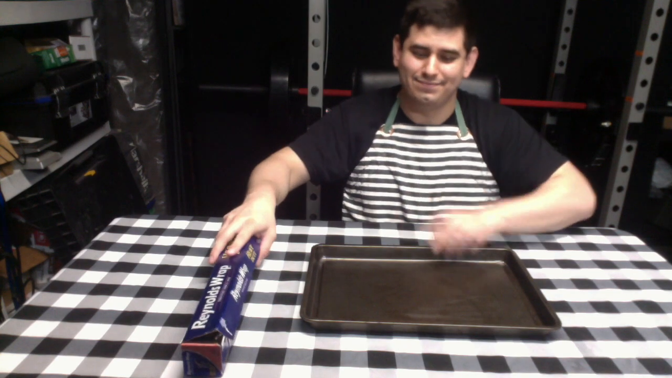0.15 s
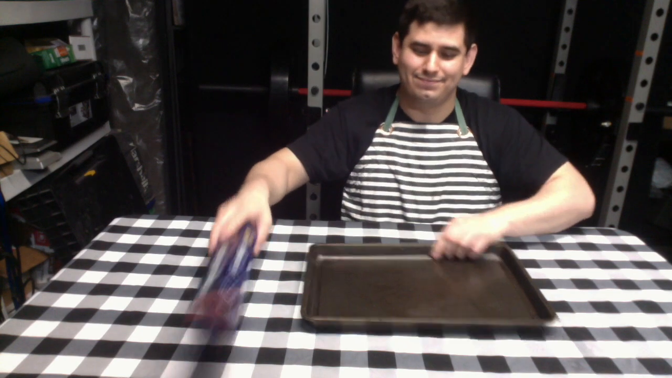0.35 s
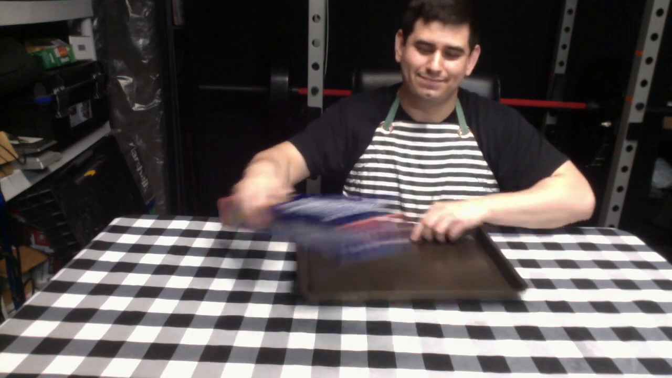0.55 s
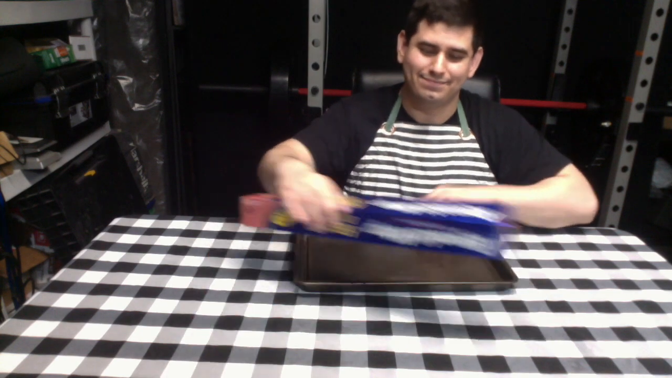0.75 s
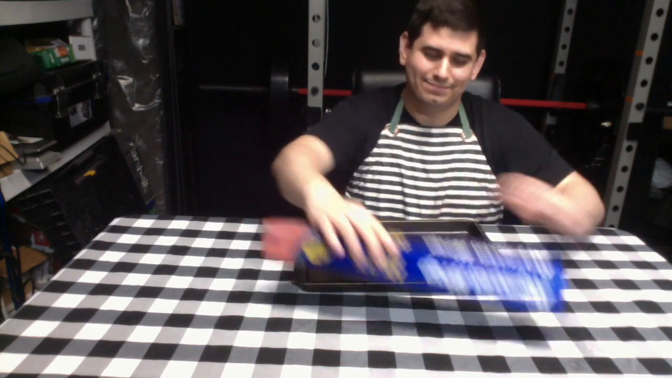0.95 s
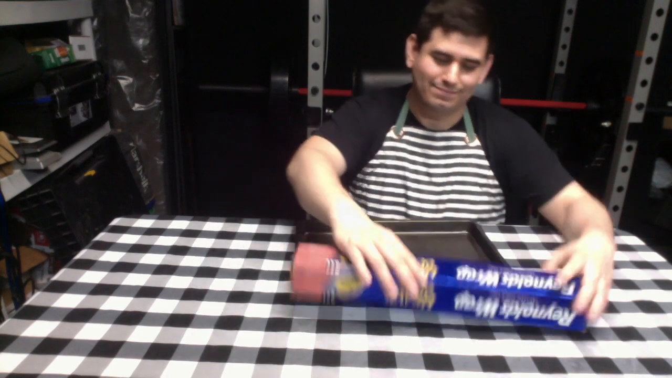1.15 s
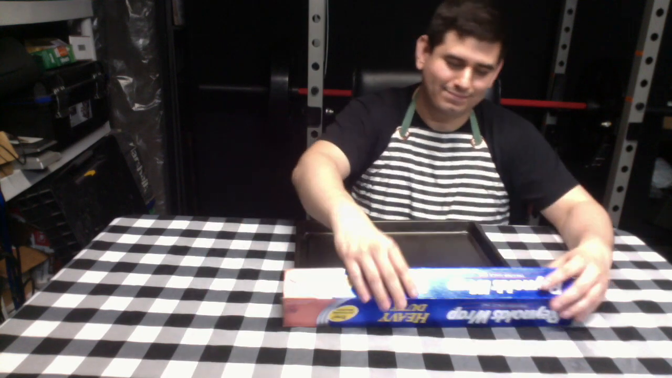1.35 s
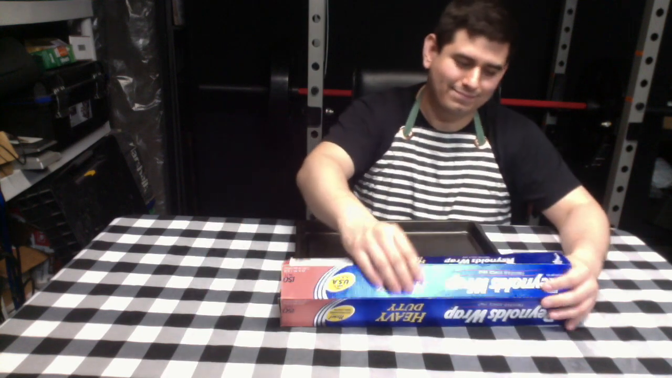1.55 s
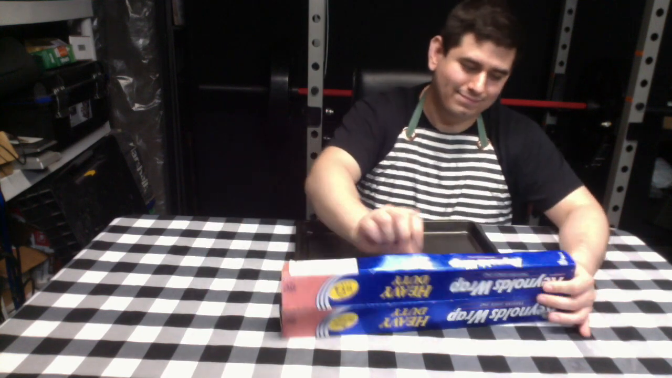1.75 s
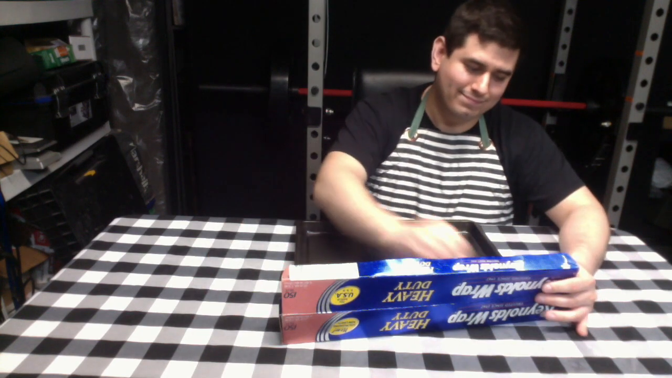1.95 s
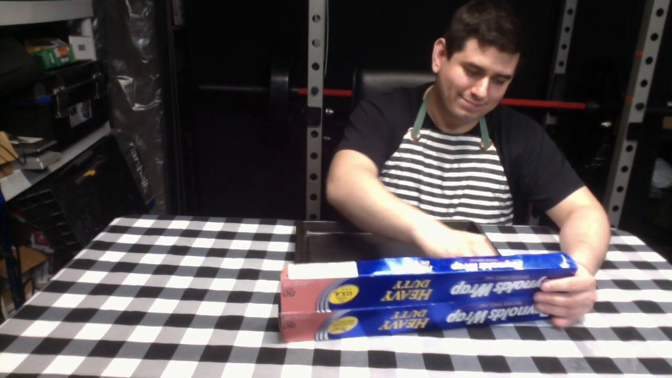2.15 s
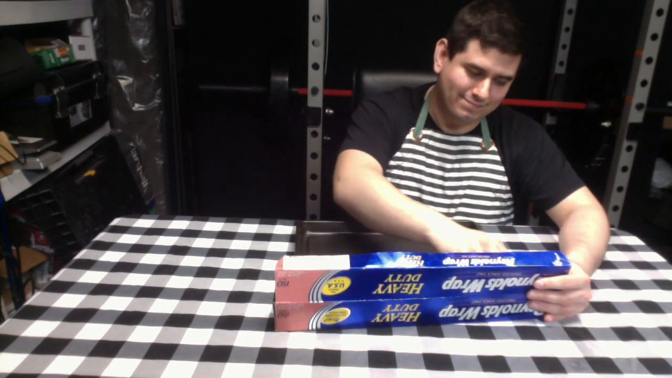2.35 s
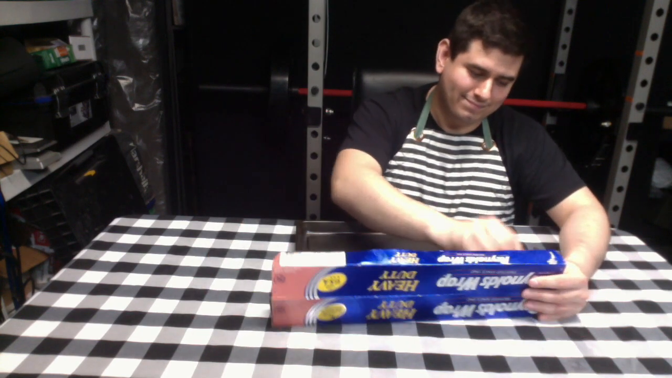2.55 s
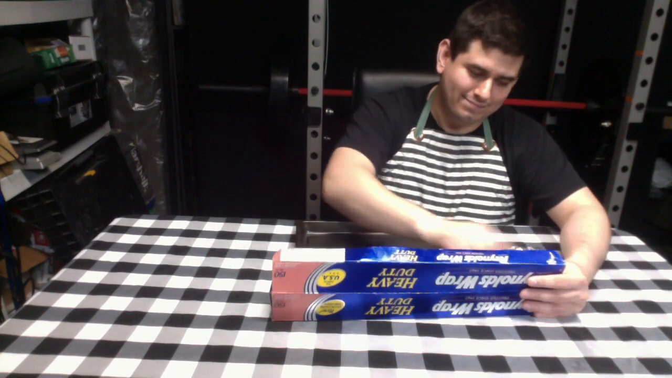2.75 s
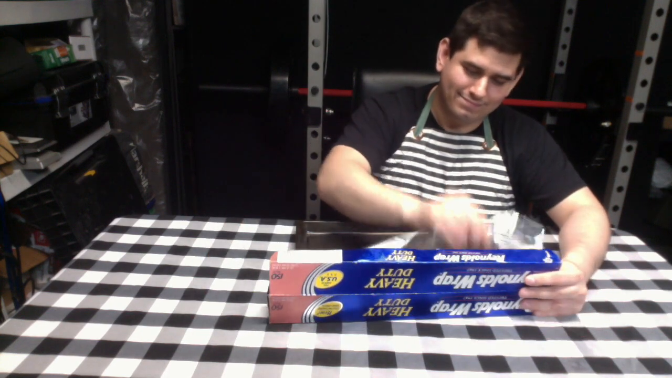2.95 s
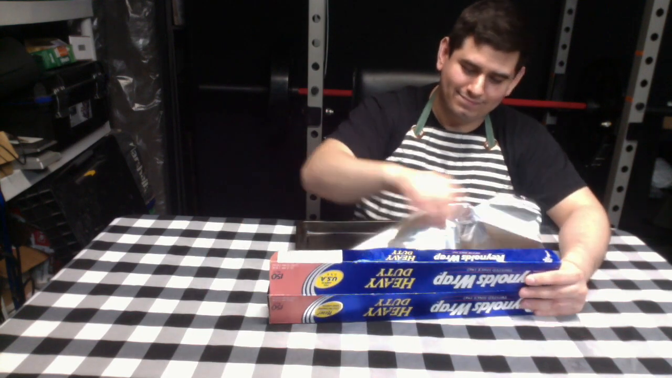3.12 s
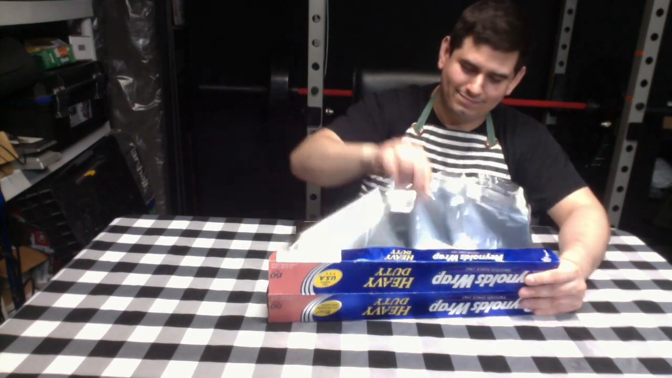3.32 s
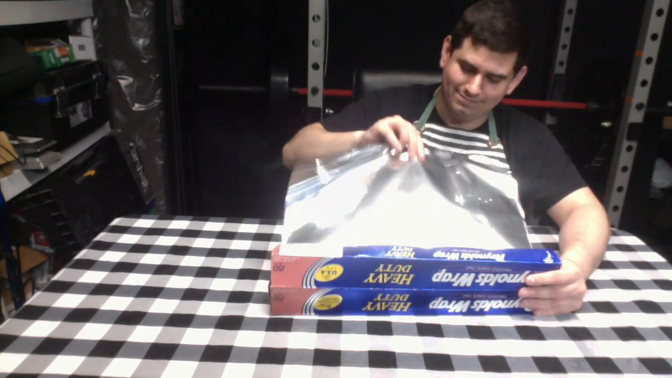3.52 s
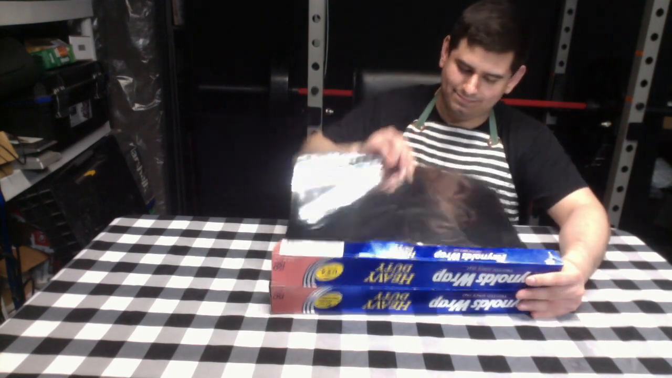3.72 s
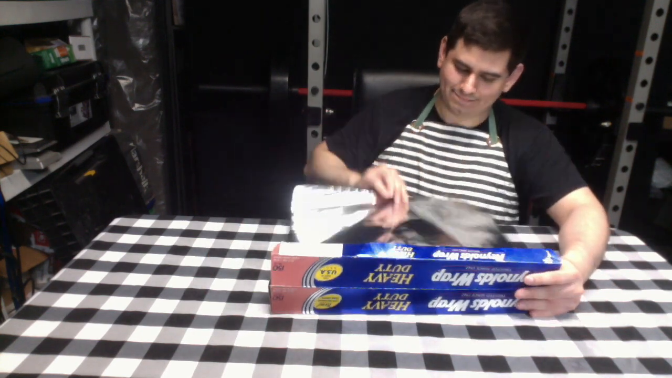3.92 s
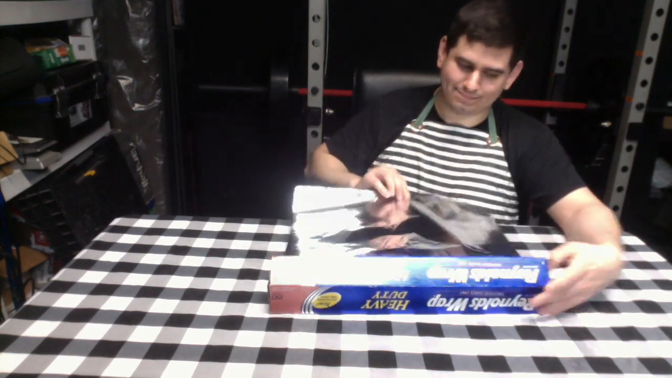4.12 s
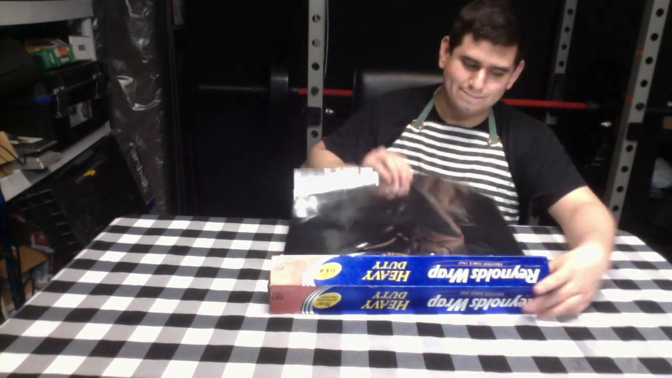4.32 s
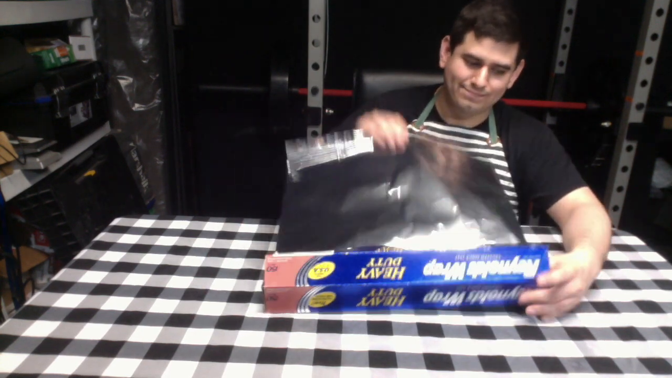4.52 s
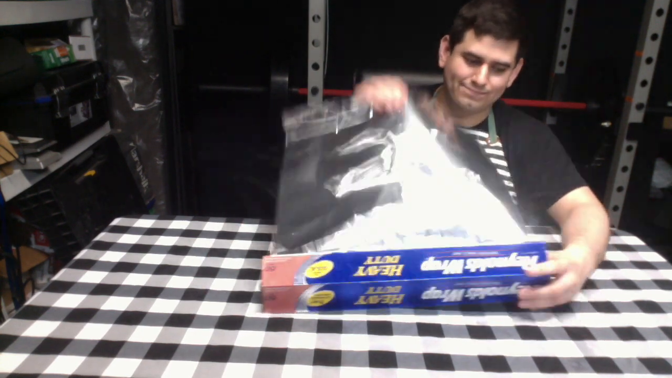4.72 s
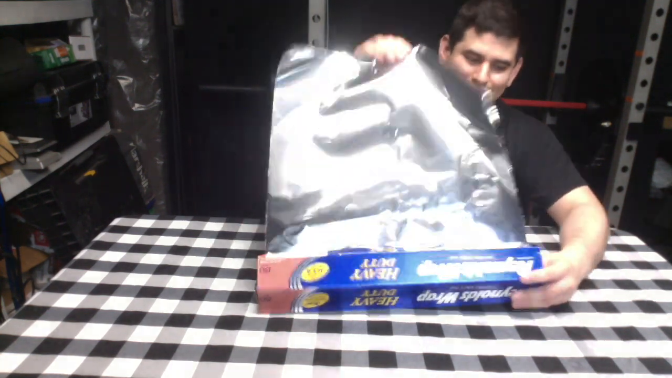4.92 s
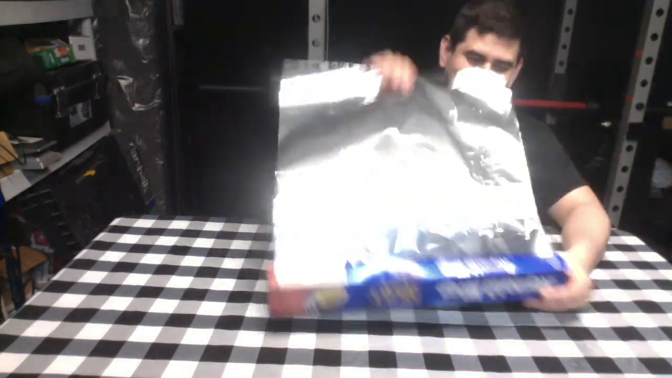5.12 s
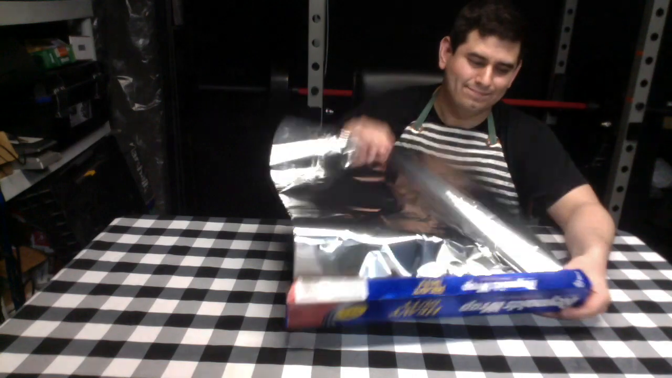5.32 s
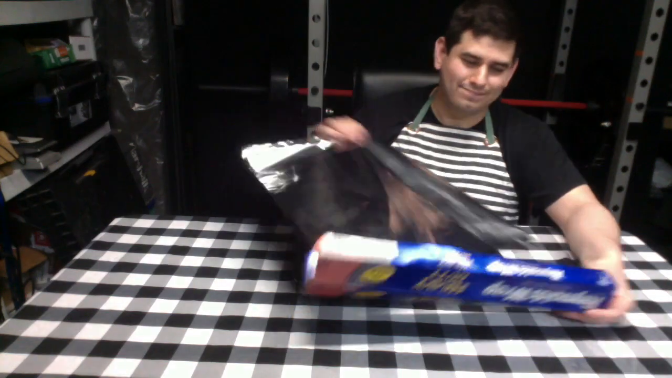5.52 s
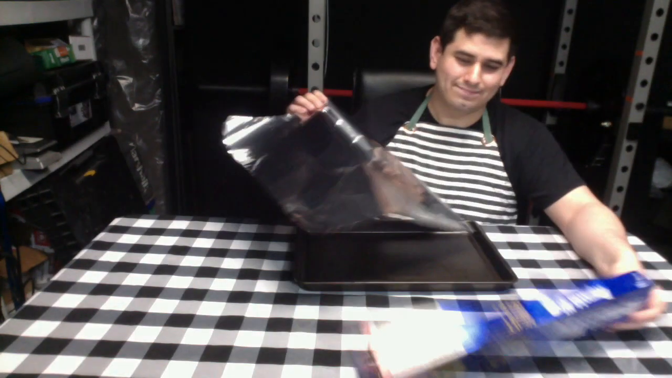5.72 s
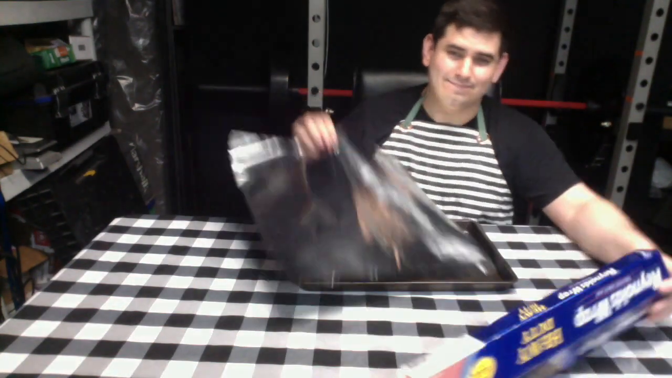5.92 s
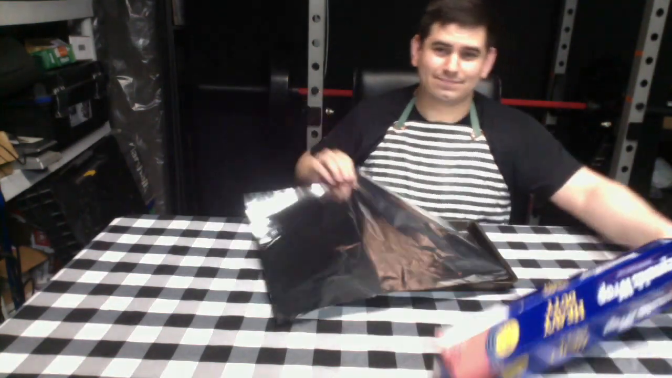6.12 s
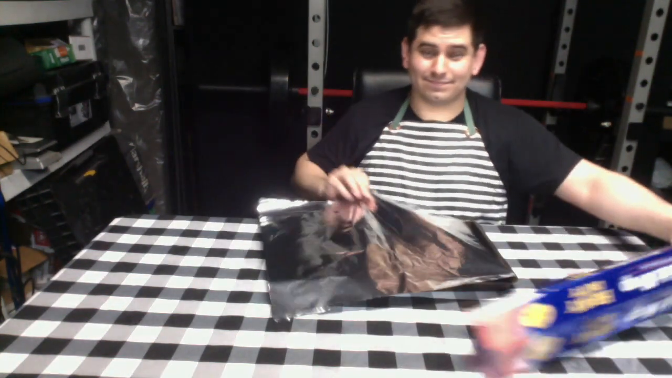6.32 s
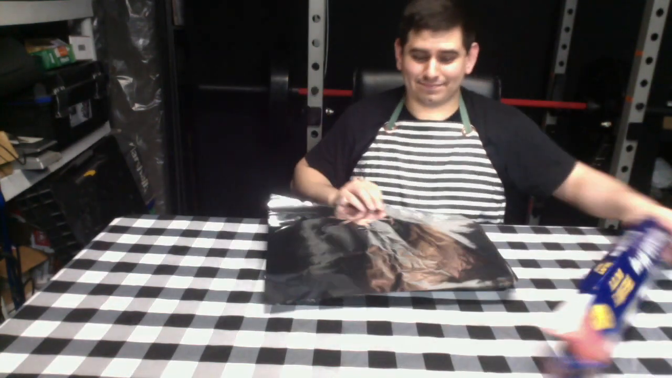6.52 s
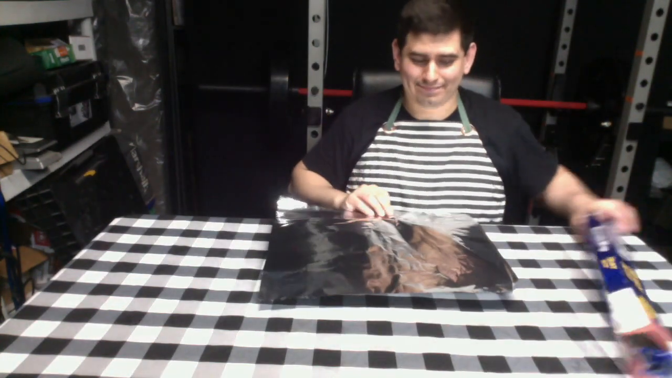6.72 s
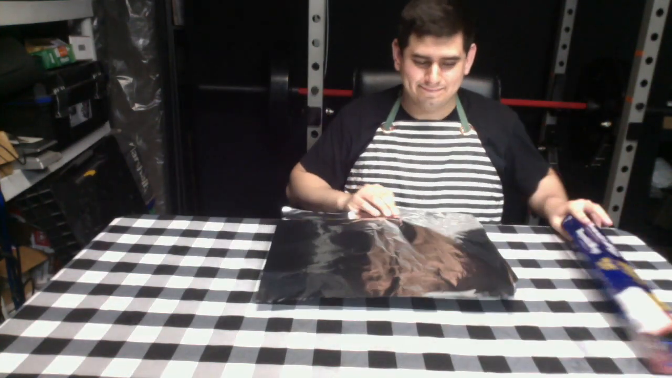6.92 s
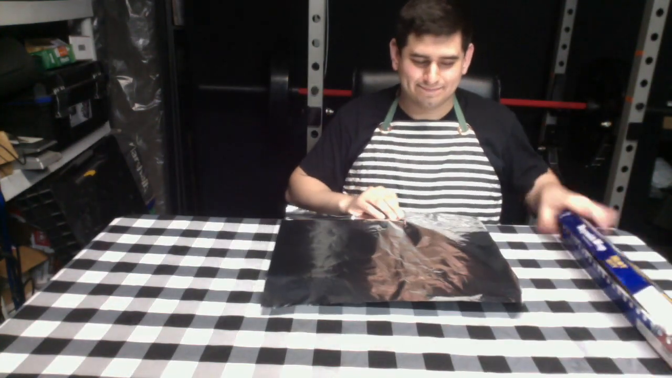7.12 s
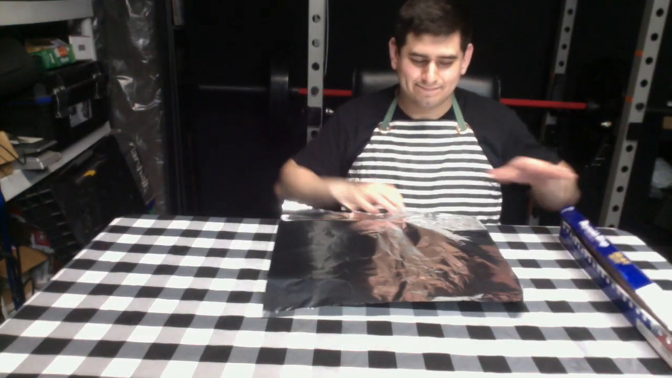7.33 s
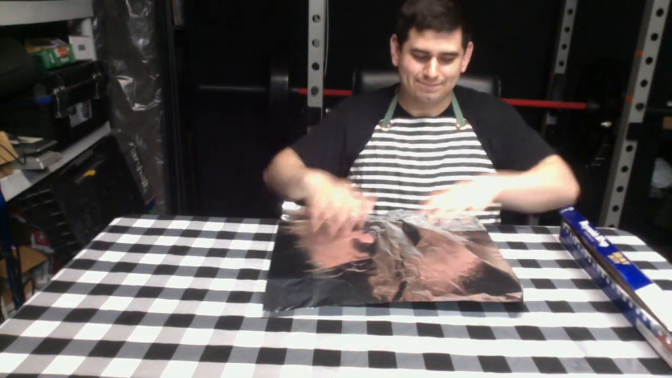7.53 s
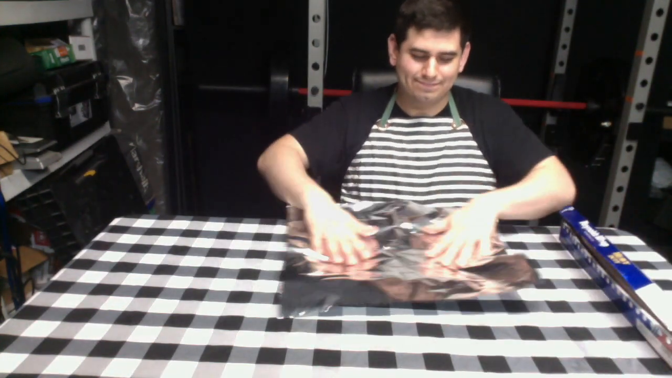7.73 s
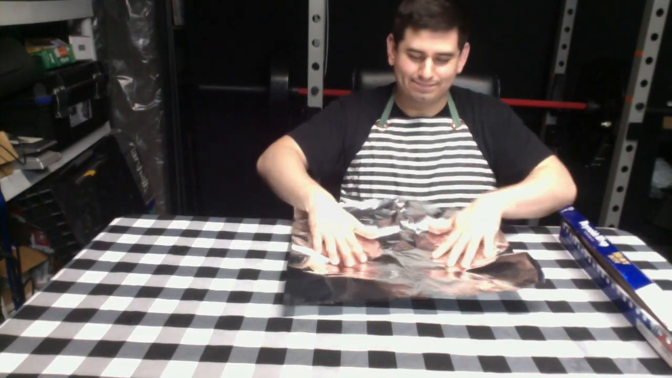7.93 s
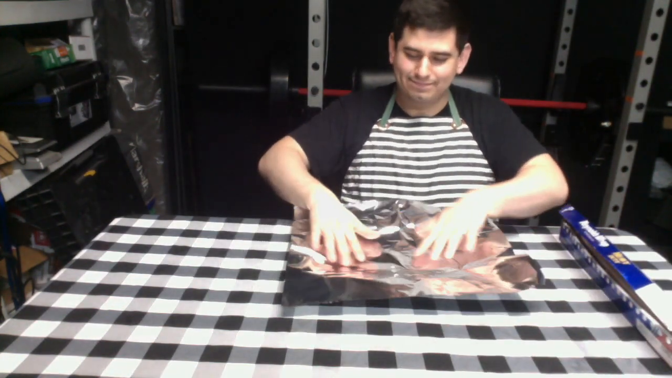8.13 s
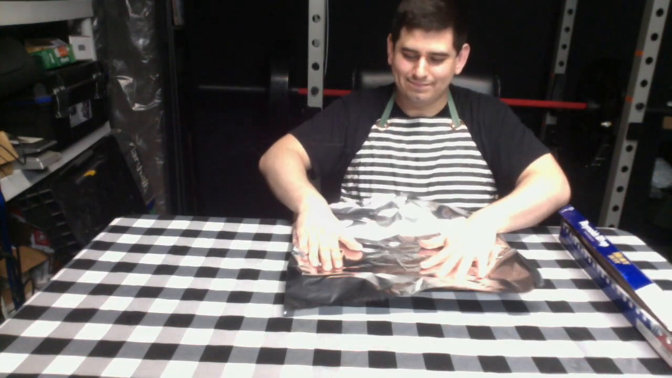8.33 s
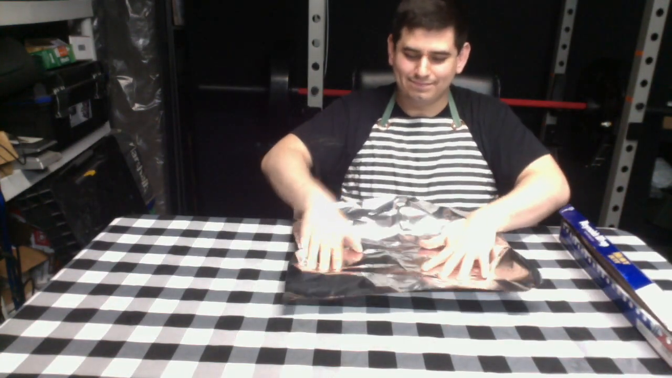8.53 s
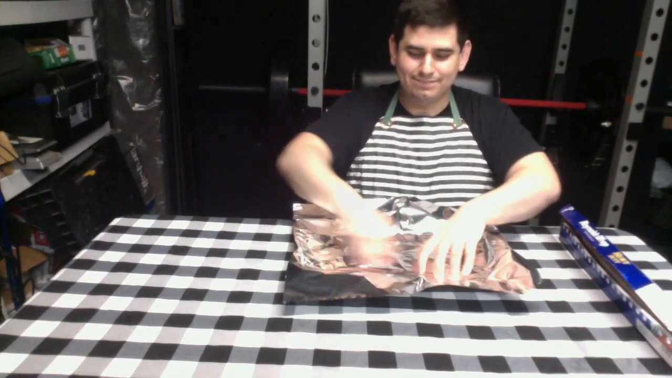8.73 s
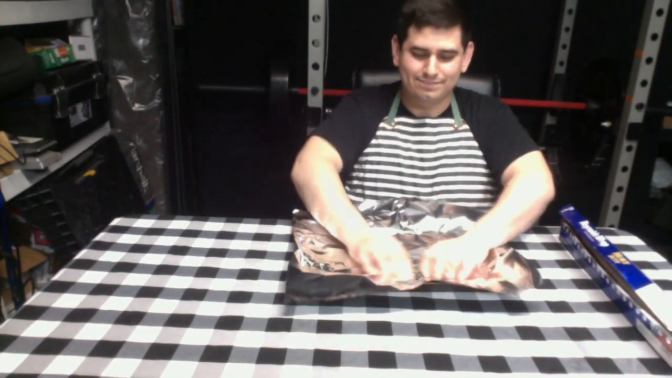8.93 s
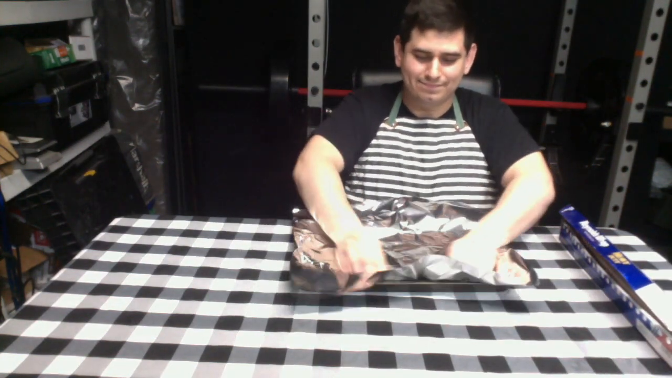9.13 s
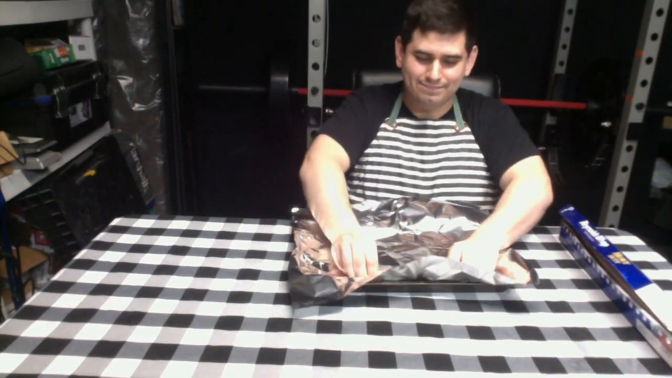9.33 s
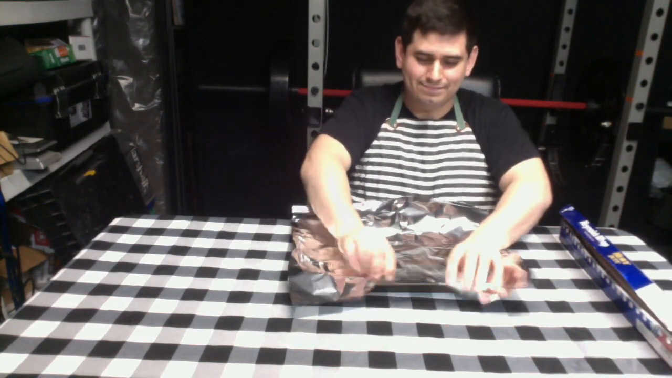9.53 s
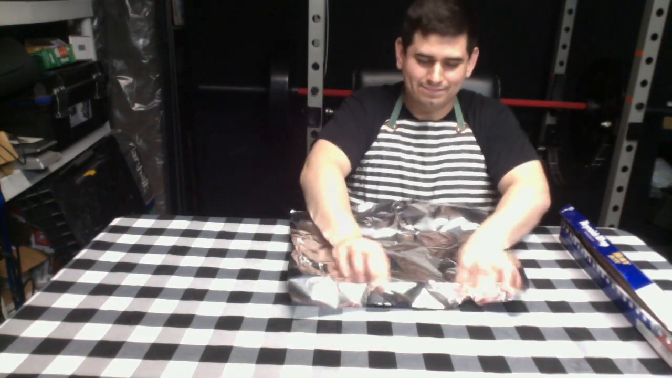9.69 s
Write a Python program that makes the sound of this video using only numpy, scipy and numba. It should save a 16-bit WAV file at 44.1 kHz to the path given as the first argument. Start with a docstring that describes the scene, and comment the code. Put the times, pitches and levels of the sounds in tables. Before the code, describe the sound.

In a small room, close to one microphone, a baking sheet and carton scuff across a cloth-covered table. The carton lands with a dull thump and its lid squeaks faintly. Foil rustles out in swelling crackles, goes briefly slack, is pulled taut and rips along the cutter with a raspy metallic ring. After a knock and lighter rustling, hands press it down in crisp bursts with sharp pops.

```python
"""Aluminium foil is drawn off the roll, torn along the cutter, laid on a baking sheet and pressed down.
Thousands of tiny buckles a second, each a short damped ring, make the crinkle; the torn edge rings in catches.
Before that the sheet slides over a tablecloth in crackling shoves, and the carton is set down and opened.
Knocks are table resonances with noise clatter, snaps are noise cracks with a tone, the lid is a wavering sine.
A small room of decaying noise smears it all for one microphone, over faint noise for the air."""
import sys
import numpy as np
from scipy import signal
from scipy.fft import rfft, irfft
from scipy.io import wavfile
from scipy.ndimage import uniform_filter1d, minimum_filter1d
from numba import njit

SR = 44100
rng = np.random.default_rng(int(sys.argv[2]) if len(sys.argv) > 2 else 0)


def wrap_up_sound(samples):
    """Save the sound to the file named by the first command line argument, as 16-bit audio."""
    columns = np.atleast_2d(samples).T
    # keep every value between -1 and 1, then stretch to whole-number steps
    tamed = np.clip(columns, -1, 1)
    steps = np.round(tamed * 32767).astype(np.int16)
    wavfile.write(sys.argv[1], SR, steps)


N = 430416
TIME = np.arange(N) / SR
# frequency ranges in which creases, fine wrinkles and broad panels are balanced (Hz)
CREASE_HZ, WRINKLE_HZ, PANEL_HZ = (1500, 5000), (8000, 15000), (400, 1200)

# overlapping bands of the foil and how far each follows a kind of facet:
# centre_hz, fine_wrinkles (factor), broad_panels (factor), drumming_on_sheet (factor)
BANDS = [(150, .3, 1, 0), (800, 0, 1, 0), (1550, 0, .25, 1), (2300, -.05, 0, .5), (4500, .25, 0, -.5),
         (7000, .6, 0, -.25), (11000, 1, 0, 0), (15000, 1.3, 0, 0)]
# crumples, where a hand grabs, tugs or presses the foil:
# start_s, rise_s, hold_s, level_db, fine_wrinkles_relative_db, broad_panels_relative_db
CRUMPLES = [(2.232, 0.019, 0.0051, -64, -6, -12), (2.347, .036, 0.0029, -53, -7.5, -1),
            (2.464, 0.033, 0.061, -52, -9.5, -4.5), (2.6, 0.016, 0.018, -59, -4.5, -8),
            (2.776, .015, 0.032, -47, -11.5, -14), (2.856, 0.05, 0.015, -46, -6.5, -5.5),
            (2.938, 0.021, .022, -43, -8.5, -7.5), (3.213, 0.02, .02, -45, -2.5, -7.5),
            (3.329, 0.025, 0.04, -41, -4, -25), (3.729, 0.042, .02, -41, -2, -12),
            (3.936, .03, 0.063, -45, -3.5, -15), (4.396, .016, .015, -43.5, -3.5, -9.5),
            (4.462, 0.035, 0.019, -43, -1.5, -16), (4.623, 0.028, 0.023, -37.5, -4.5, -24),
            (4.841, 0.062, 0.0077, -36, -3.5, -14), (5.064, .022, .02, -38.5, -0.5, -12),
            (5.112, 0.019, 0.072, -34, -2.5, -11.5), (5.238, .02, 0.26, -33, 0.5, -11),
            (5.865, .05, 0.014, -46, -1.5, -25), (6.018, 0.021, 0.019, -45, 0, -14.5),
            (6.056, 0.034, 0.026, -38, -2, -19), (6.273, 0.031, 0.048, -50, -5.5, -16),
            (6.354, 0.032, 0.04, -44.5, -4, -15.5), (6.548, 0.023, .012, -51, -2, -11.5),
            (6.653, 0.013, 0.015, -51, 0.5, -11.5), (6.945, 0.026, .02, -54, -4, -10.5),
            (7.159, .02, .02, -53, -7, -18), (7.223, 0.023, .015, -53, -15, -16),
            (7.518, .02, 0.044, -34.5, -2.5, -14), (7.624, .02, .022, -41, -1, -18),
            (7.747, .012, 0.11, -44, -4.5, -15), (8.126, 0.031, 0.03, -34.5, -0.7, -12.5),
            (8.393, 0.025, .02, -45, -8.5, -23), (8.549, 0.039, 0.075, -48.5, -7, -11.5),
            (8.761, .016, 0.044, -36.5, -6, -12), (8.895, .02, 0.048, -40.5, -9, -16),
            (8.998, 0.021, 0.051, -46, -8, -9.5), (9.146, 0.02, 0.013, -51, -7, -8),
            (9.254, 0.034, 0.047, -47, -10.5, -8), (9.39, 0.014, 0.066, -44, -8, -9),
            (9.5, 0.033, 0.25, -44.5, -11, -43)]


def amp(db):
    """Decibels to gain."""
    return 10 ** (np.asarray(db) / 20)


def rms(x):
    """Root mean square."""
    return np.sqrt(np.mean(x ** 2)) + 1e-12


def curves(table):
    """Each column of a table joined by straight lines in time."""
    s, *columns = np.transpose(table)
    return [np.interp(TIME, s, column) for column in columns]


def during(table):
    """One while a table lasts, with short fades."""
    inside = (TIME >= table[0][0]) & (TIME <= table[-1][0])
    return uniform_filter1d(1. * inside, size=300)


def colour(x, points):
    """Filter by a spectrum of (Hz, dB) points, joined on a logarithmic frequency axis."""
    hz, db = np.transpose(points)
    f = np.maximum(np.fft.rfftfreq(len(x), 1 / SR), 1)
    gain = amp(np.interp(np.log(f), np.log(hz), db))
    return irfft(rfft(x) * gain, len(x))


def band(x, edges, kind="bandpass"):
    """Zero-phase filter, so that bands add up again."""
    return signal.sosfiltfilt(signal.butter(2, edges, kind, fs=SR, output="sos"), x)


def band_rms(x, edges):
    """Level of the part of x between two frequencies."""
    f = np.fft.rfftfreq(N, 1 / SR)
    inside = (f > edges[0]) & (f < edges[1])
    return np.sqrt(2 * np.sum(abs(rfft(x)[inside]) ** 2)) / N


def octave(x, order):
    """One of the overlapping bands that add up to x."""
    f = np.maximum(np.fft.rfftfreq(N, 1 / SR), 1)
    centres = np.transpose(BANDS)[0]
    weight = np.interp(np.log(f), np.log(centres), np.eye(len(BANDS))[order])
    return irfft(rfft(x) * weight, N)


def walk(rate):
    """Random wandering with a spread near one, drawn anew rate times a second."""
    return 1.2 * np.interp(TIME * rate, np.arange(N), rng.standard_normal(N))


def fade(t, t60):
    """Exponential decay by 60 dB in t60 seconds."""
    return np.exp(-np.log(1000) * t / t60)


def linger(power, t60):
    """Sound power dying away after each push."""
    keep = fade(2 / SR, t60)  # power falls twice as fast as amplitude
    return signal.lfilter([1 - keep], [1, -keep], power)


def add(out, s, x):
    """Mix x in at time s."""
    i = max(int(s * SR), 0)
    out[i:i + len(x)] += x[:N - i]


def strokes(rows, db, stop_db_per_s):
    """Summed power of hand movements (start_s, rise_s, hold_s, ..): each swells, holds and dies away."""
    power, t = np.full(N, 1e-12), TIME[:SR]
    for (s, rise_s, hold_s, *_), level_db in zip(rows, db):
        swell = np.sin(np.pi / 2 * np.minimum(t / rise_s, 1)) ** 2
        since_hold = np.maximum(t - rise_s - hold_s, 0)
        add(power, s, (swell * amp(level_db - stop_db_per_s * since_hold)) ** 2)
    return power


@njit
def ring(start, hz, cycles, size):
    """Sum of damped sines, one for each grain, falling to 1/e in the given cycles."""
    out = np.zeros(N)
    for k in range(len(start)):
        pole = np.exp((2j * np.pi - 1 / cycles[k]) * hz[k] / SR)
        z = size[k] + 0j
        for i in range(int(start[k]), min(N, int(start[k] + 6 * cycles[k] * SR / hz[k]))):
            out[i] += z.imag
            z *= pole
    return out


def crackle(rate, spread_db, cycles):
    """Random buckles, rate a second, each ringing briefly at the pitch of its facet; white on average."""
    start = np.flatnonzero(rng.random(N) < rate / SR)
    pitch, strength, length, sign = rng.random((len(start), 4)).T
    hz = 150 + 16000 * pitch ** 2
    # low pitches are drawn more often and high ones fade sooner: taller high peaks even the spectrum
    tilt = hz ** (3 / 4)
    size = np.sign(sign - .5) * amp(spread_db * strength ** 2) * tilt / np.sqrt(rate[start])
    x = ring(1. * start, hz, cycles * (.5 + length), size)
    return x / rms(x)


def catches(table, rate, cycles, ratio=1):
    """An edge catching at random, rate a second, each catch ringing near a pitch that glides."""
    hz, db = curves(table)
    start = np.flatnonzero(rng.random(N) < rate / SR)
    scatter, sign = rng.standard_normal((len(start), 2)).T
    pitch = ratio * hz[start] * np.exp(.35 / cycles * scatter)
    x = ring(1. * start, pitch, np.full(len(start), 1. * cycles), np.sign(sign))
    return x / rms(x) * amp(db) * during(table)


def air():
    """Steady noise of the air in the room, strongest in the bass and low middle."""
    # spectrum of the air: frequency_hz, level_db_per_hz
    air_colour = [(29, -37), (50, -20), (136, -5.5), (800, -9.5), (1900, -11.5), (15000, -38)]
    noise = colour(rng.standard_normal(N), air_colour)
    return noise / rms(noise) * amp(-81)


def room(x):
    """The tail of a small room, decaying noise that is shorter in the treble."""
    t = TIME[:SR // 2]
    noise = rng.standard_normal(len(t))
    low = band(noise, 3700, "lowpass")
    tail = low * fade(t, 0.24) + 2.0 * (noise - low) * fade(t, 0.087)
    tail = tail * (1 - fade(t, 0.033))  # builds up gradually
    return signal.fftconvolve(x, tail / np.linalg.norm(noise * fade(t, 0.17)))[:N]


def walls(x):
    """Weak early reflections from the table and the nearest walls."""
    t = TIME[:SR // 16]
    echo = rng.standard_normal(len(t)) * fade(t, 0.095)
    return x + amp(-14) * signal.fftconvolve(x, echo / np.linalg.norm(echo))[:N]


def slide():
    """Cloth fibres catch and slip under the sheet and the carton at every shove."""
    # shoves, levels before a common trim: start_s, rise_s, hold_s, level_db, grit_relative_db
    shoves = [(0.001, 0.037, .01, -65, -24), (0.068, .01, .02, -64, -11), (0.143, .015, 0.05, -58, -17),
              (0.196, 0.24, 0.22, -65.5, -7.5), (0.73, 0.09, 0.011, -58.5, -12),
              (0.999, .008, 0.035, -64.5, -10), (1.064, 0.031, 0.056, -59.5, -11.5),
              (1.178, 0.0089, 0.017, -60, -1.5), (1.25, 0.018, 0.037, -66, -6.5),
              (1.34, 0.016, 0.35, -69, -30), (1.627, 0.062, 0.052, -61.5, -17)]
    # spectrum of the rubbing: frequency_hz, level_db_per_hz
    slide_colour = [(53, -55), (90, -21), (172, -12.5), (400, -10), (500, -12), (600, -10), (1400, -8),
                    (2430, -3), (2950, -4.5), (8660, -16), (15500, -21.5)]
    *_, db, grit_db = np.transpose(shoves)
    rubbing = np.sqrt(strokes(shoves, db, stop_db_per_s=242))
    scraping = np.sqrt(strokes(shoves, db + grit_db, stop_db_per_s=274))
    x = colour(crackle(np.full(N, 14000.), spread_db=6.0, cycles=2.0), slide_colour)
    x = x + 0.77 * band(x, (2130, 2420))  # the metal sheet sings along
    grit = band(x, 4200, "highpass")
    rub = (x - grit) / band_rms(x, CREASE_HZ) * rubbing
    scrape = grit / band_rms(x, WRINKLE_HZ) * scraping
    return (rub + scrape) * amp(-1.0)


def lid():
    """The cardboard lid sticks and slips in a thin, unsteady squeak."""
    # the lid rubbing open, level before trim and flutter: time_s, pitch_hz, level_db
    lid_squeak = [(1.5, 640, -77), (1.555, 635, -65), (1.62, 650, -69), (1.66, 635, -79), (1.695, 620, -58),
                  (1.75, 590, -78)]
    hz, db = curves(lid_squeak)
    phase = np.cumsum(hz * (1 + .06 * walk(250))) / SR
    return np.sin(2 * np.pi * phase) * amp(db - 1 + 4 * walk(90)) * during(lid_squeak)


def knocks():
    """Each dull blow excites the table's resonances around one pitch; the carton and the roll inside clatter."""
    # carton, sheet and hands on the table, levels before trims:
    # start_s, peak_db, clatter_relative_db, thump_centre_hz
    blows = [(0.174, -53.5, -11, 171), (0.995, -36.5, -11, 270), (1.024, -48, -9, 190),
             (1.105, -37.5, -7, 280), (1.174, -25.5, -11, 300), (1.197, -45, 1, 300), (1.355, -43, -1, 400),
             (4.33, -58, -2, 198.6), (4.495, -54, 7, 200), (5.677, -36, 1, 370.5), (5.697, -39.5, -5, 360),
             (5.84, -42, -4.5, 330.4), (6.694, -57, -15, 230.4), (8.15, -53, -6, 130.1),
             (9.156, -51.5, -2, 150.3), (9.194, -52, -2, 140)]
    # resonances of the table top, pitch before each blow's detuning: pitch_hz, level_db, t60_s
    table_modes = [(140, -8.5, 0.13), (202.5, 0, 0.065), (260, 1.5, 0.044), (337, 2.5, 0.031),
                   (413, 2.5, 0.046), (555, 4.5, 0.051)]
    # spectrum of the clatter: frequency_hz, level_db_per_hz
    clatter_colour = [(200, -10), (500, 6.5), (1400, -3.5), (2400, -6), (4500, -13), (9000, -54),
                      (15000, -54)]
    out, t = np.zeros(N), TIME[:SR // 2]
    for s, db, clatter_db, centre_hz in blows:
        thump = np.zeros(len(t))
        for hz, mode_db, t60 in table_modes:
            drive = amp(mode_db - 19.0 * np.log2(hz / centre_hz) ** 2)
            detuned_hz = hz * (1 + .04 * rng.standard_normal())
            thump += drive * np.sin(2 * np.pi * detuned_hz * t) * fade(t, t60)
        thump = thump * (1 - fade(t, 0.016)) ** 2  # soft onset
        clatter = colour(rng.standard_normal(len(t)), clatter_colour)
        clatter = clatter * fade(t, 0.14) * (1 - fade(t, 0.0088))
        blow = amp(-0.5) * thump / abs(thump).max()
        blow += amp(clatter_db - 1.5) * clatter / abs(clatter).max()
        add(out, s, amp(db) * blow)
    return out


def snaps():
    """A larger facet flips over: a crack, then a short ring around its own pitch, with little bass."""
    # single snaps of card and metal, strength before a common trim: start_s, strength_db, pitch_hz
    flips = [(0.073, -48, 2330), (0.153, -44, 1340), (1.344, -51, 900), (1.813, -44, 1750),
             (2.376, -41, 900), (2.781, -35, 1940), (2.781, -37, 830), (2.86, -41, 850), (4.312, -36, 3120),
             (5.676, -35, 1300), (5.677, -36, 720), (7.753, -37, 1050), (8.773, -29, 1640),
             (8.925, -32, 1910), (9.377, -40, 1300), (9.398, -32, 1450), (9.439, -34, 900),
             (9.443, -32, 2260), (9.588, -32, 1750)]
    out, t = np.zeros(N), TIME[:SR // 4]
    for s, db, hz in flips:
        peak = [(hz / 8, -45), (hz / 2.16, -11), (hz, 0), (hz * 1.53, -10), (hz * 8, -42)]
        crack = colour(rng.standard_normal(len(t)), peak) * fade(t, 0.085)
        tone = np.sin(2 * np.pi * hz * t) * fade(t, .055) * (1 - fade(t, .01))
        no_bass = signal.butter(2, hz / 2, "highpass", fs=SR, output="sos")
        x = signal.sosfilt(no_bass, crack / abs(crack).max() + tone)
        add(out, s, amp(db - 4.5) * x)
    return out


def creak():
    """The slack foil creaks in quick catches as it is pulled taut again."""
    # the creak rising: time_s, pitch_hz, level_db
    tighten = [(4.325, 851, -68), (4.365, 1048, -59), (4.405, 2120, -57)]
    return catches(tighten, rate=700, cycles=3)


def tear():
    """Cutter teeth snag the taut edge, which rings at its own pitch, an octave above and an octave below, while
    the sheet rips ahead of the cutter."""
    # the tear running along the cutter, levels before each part's trim: time_s, edge_pitch_hz, level_db
    taut_edge = [(5.24, 750.5, -49), (5.35, 899, -34.5), (5.405, 1001, -43), (5.46, 940, -33),
                 (5.508, 1060, -26.5), (5.54, 1660, -28), (5.572, 1645, -52)]
    # the sheet ripping ahead of the cutter: time_s, pitch_hz, level_db
    rip_ahead = [(5.25, 2600, -35), (5.325, 1860, -27.5), (5.38, 2600, -28), (5.425, 2398, -38),
                 (5.48, 2330, -28), (5.545, 1900, -36)]
    lower = catches(taut_edge, rate=450, cycles=4.5)
    upper = catches(taut_edge, rate=450, cycles=4, ratio=2)
    body = catches(taut_edge, rate=150, cycles=1.5, ratio=.5)
    rip = catches(rip_ahead, rate=600, cycles=2)
    return band(amp(-0.5) * lower + amp(-9.0) * upper + amp(-12.5) * body + rip, 200, "highpass")


def avalanches(rate, t60):
    """Gain that jumps when a crease runs and then dies away; about one on average."""
    starts = (rng.random(N) < rate / SR) * rng.exponential(size=N)
    power = linger(starts, t60) * SR / rate + 1.2
    return np.sqrt(power / uniform_filter1d(power, size=2000))


def handling():
    """Crumples over a rustle that swells and sinks: crease level, and wrinkles and panels relative to it, in dB."""
    # rustle under the crumples, in two pulls and then while the foil is laid and pressed: time_s, level_db
    rustle = [(2.33, -88), (2.42, -65), (2.67, -69), (2.74, -52), (3.1, -49), (3.42, -39.5), (3.62, -41.5),
              (3.88, -48), (4.14, -48), (4.29, -63), (4.55, -45), (4.76, -42.5), (5.53, -44), (5.66, -55),
              (5.85, -58), (6.15, -47), (6.87, -60.5), (7.3, -59), (7.51, -85), (7.62, -45), (8.08, -57),
              (8.28, -50), (8.66, -55), (8.75, -67), (8.86, -46), (9.13, -55), (9.76, -47)]
    # share of broad panels in the rustle, high while the foil hangs slack: time_s, relative_db
    slack_panels = [(2.9, -8), (3.7, -8), (4.1, -20), (4.35, -3), (5.0, -16), (5.65, -19.5), (6.9, -12.5),
                    (9.7, -4.5)]
    *_, db, wrinkle_db, panel_db = np.transpose(CRUMPLES)
    rustle_db, = curves(rustle)
    slack_db, = curves(slack_panels)
    # a harder rustle bends the foil more sharply: -4.5 dB of fine wrinkles at a rustle of -40 dB
    sharp_db = -4.5 + 0.59 * (rustle_db + 40)
    # the fine wrinkles of the rustle come partly in little runs
    spurts_per_s, spurt_t60_s, spurt_share = 24, 0.71, 0.59
    spurts = linger(1. * (rng.random(N) < spurts_per_s / SR), spurt_t60_s) * SR / spurts_per_s
    uneven = 1 + spurt_share * (spurts - 1)
    creases = strokes(CRUMPLES, db, stop_db_per_s=180) + amp(rustle_db) ** 2
    wrinkles = strokes(CRUMPLES, db + wrinkle_db, stop_db_per_s=242)
    wrinkles = wrinkles + uneven * amp(rustle_db + sharp_db) ** 2
    panels = strokes(CRUMPLES, db + panel_db, stop_db_per_s=225) + amp(rustle_db + slack_db) ** 2
    return 10 * np.log10([creases, wrinkles / creases, panels / creases])


def foil():
    """Harder handling buckles more creases at once; sharper bends shift the sound to the fine wrinkles."""
    # foil lying against the metal sheet drums in the middle range: time_s, lift_db
    contact = [(3.3, -5), (5.0, -5.5), (6.6, 0), (8.1, -1), (8.8, 1), (9.6, 1)]
    # spectrum of the foil: frequency_hz, level_db_per_hz
    foil_colour = [(40, -60), (90, -29.5), (200, -17.5), (330, -14), (600, -6.5), (1000, -3), (1600, 1.5),
                   (2400, 1.5), (4000, -2), (6000, -7), (8100, -10), (9300, -7.5), (14500, -16.5),
                   (15800, -21)]
    db, wrinkle_db, panel_db = handling()
    contact_db, = curves(contact)
    rate = 7000 * amp(.4 * (db + 40))  # buckles a second
    buckles = crackle(rate, spread_db=12, cycles=1.8) * avalanches(rate=130, t60=.1)
    # every buckle sets the sheet shivering and scatters off things nearby, heard as a noise tail
    shiver = rng.standard_normal(N) * np.sqrt(linger(buckles ** 2, t60=.11))
    # a few taut facets tinkle on for some milliseconds
    tinkle = band(crackle(rate / 3, spread_db=6, cycles=24), 700, "highpass")
    x = colour(buckles + amp(4.5) * shiver + amp(-3) * tinkle, foil_colour)
    x = x / band_rms(x, CREASE_HZ)
    fine_db = wrinkle_db - 20 * np.log10(band_rms(x, WRINKLE_HZ))
    broad_db = panel_db - 20 * np.log10(band_rms(x, PANEL_HZ))
    out = np.zeros(N)
    for k, (_, fine, broad, drum) in enumerate(BANDS):
        # the mix of facet sizes keeps changing under the fingers
        flicker_db = 1.04 * walk(35)
        out += octave(x, order=k) * amp(fine * fine_db + broad * broad_db + drum * contact_db + flicker_db)
    # air pushed by the moving sheet, 52 dB below the wrinkles
    waft = band(rng.standard_normal(N), (45, 120))
    out += waft / rms(waft) * amp(wrinkle_db - 52)
    return out * amp(db - 0.05) * (TIME > CRUMPLES[0][0])


def scene():
    """All sources in the room, the same in both channels."""
    sheet = foil() + tear() + creak()
    carton = slide() + knocks() + snaps() + lid()
    tail = room(amp(-14.0) * sheet + amp(-8.0) * carton)
    mono = walls(sheet) + carton + tail + air()
    return np.array([mono, mono])


def record(dry):
    """A fast limiter holds the peaks near -23.3 dB; the top is cut above 15.9 kHz."""
    needed = np.minimum(1, amp(-23.3) / (abs(dry) + 1e-9))
    gain = uniform_filter1d(minimum_filter1d(needed, size=21), size=21)
    return signal.sosfiltfilt(signal.ellip(10, .1, 45, 15900, fs=SR, output="sos"), dry * gain)


dry = scene()
out = record(dry)
wrap_up_sound(out)
```